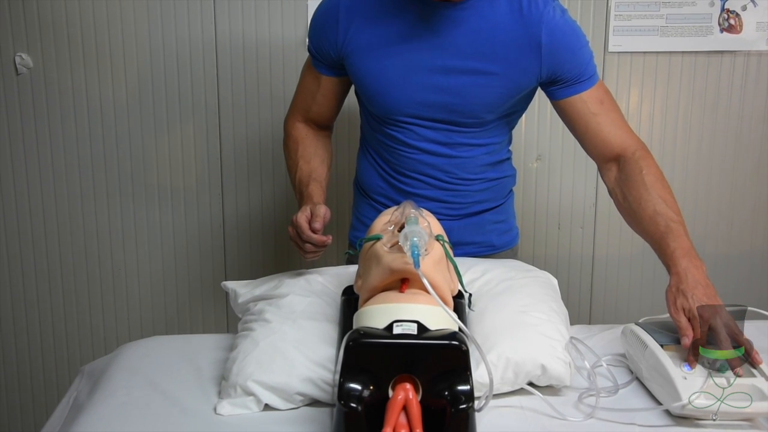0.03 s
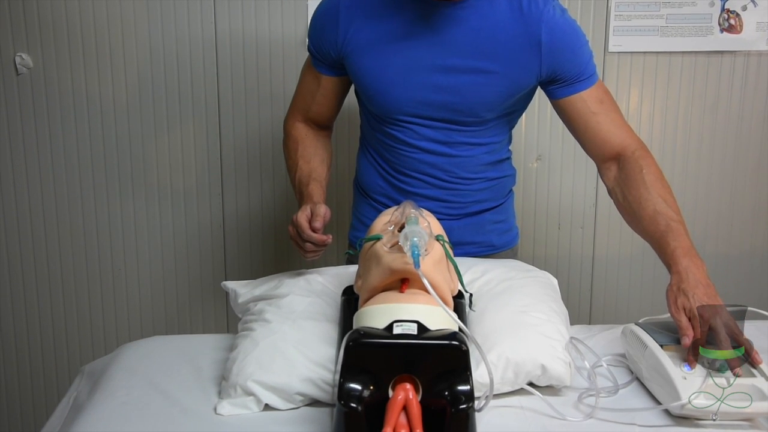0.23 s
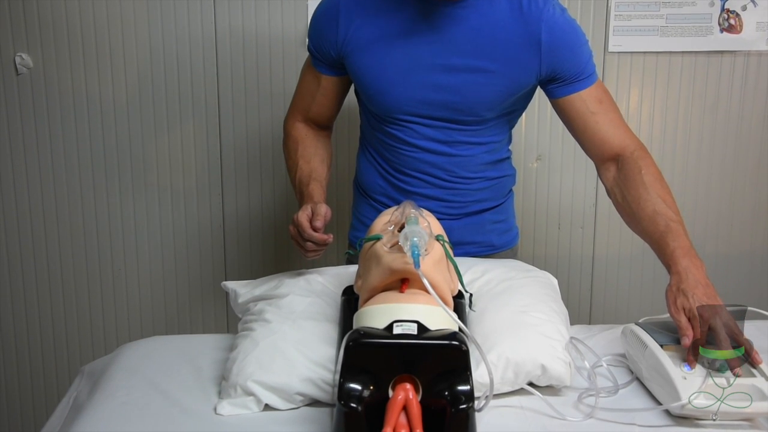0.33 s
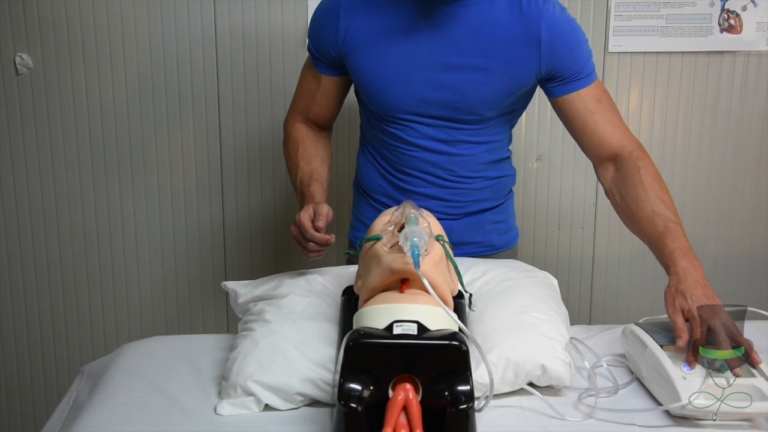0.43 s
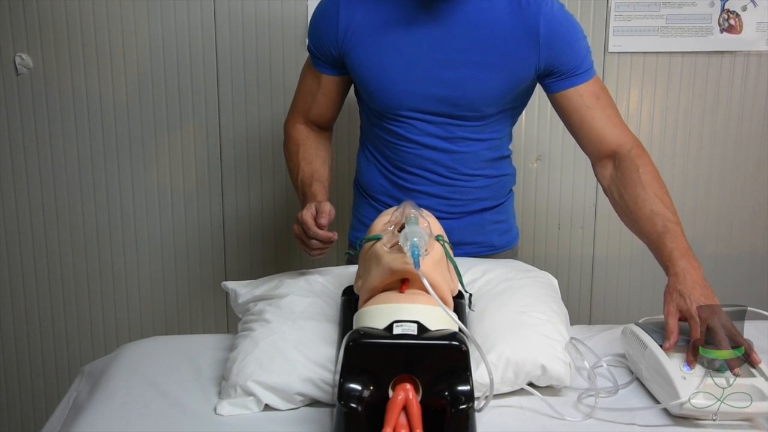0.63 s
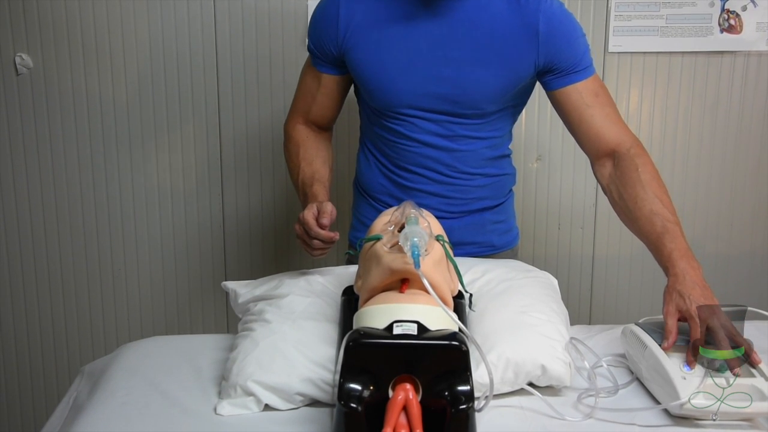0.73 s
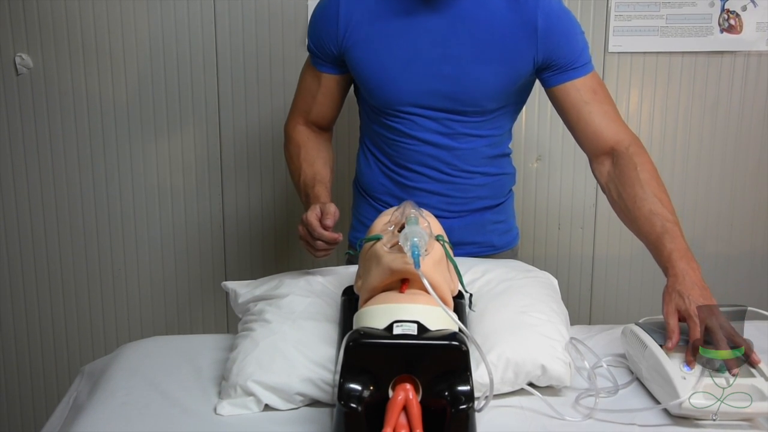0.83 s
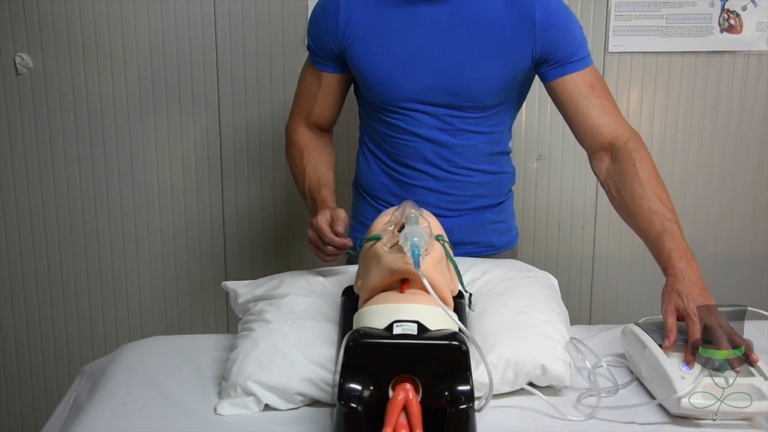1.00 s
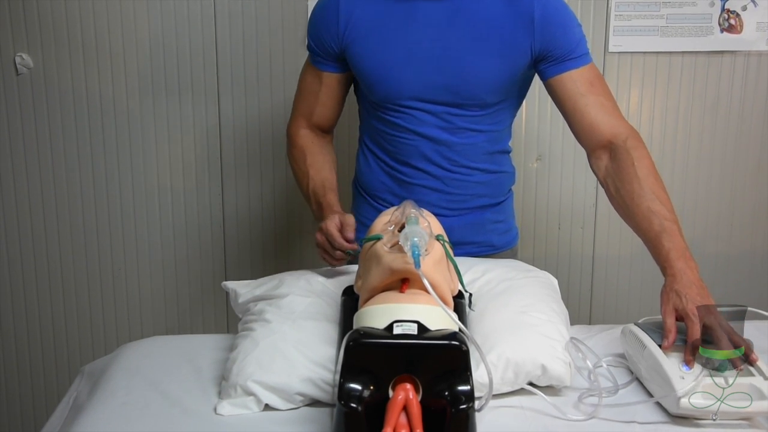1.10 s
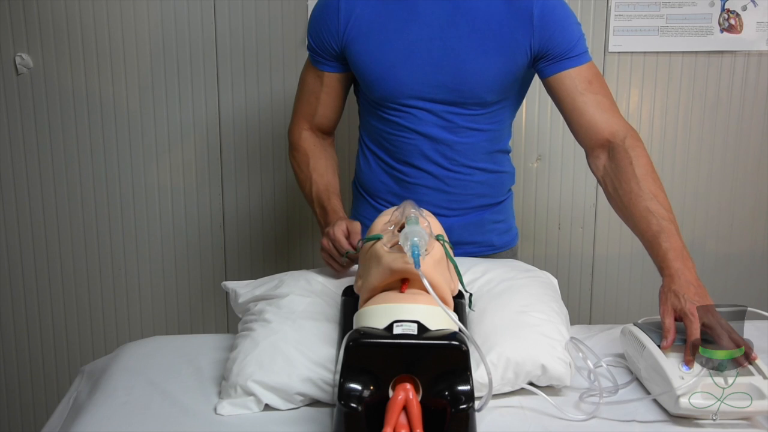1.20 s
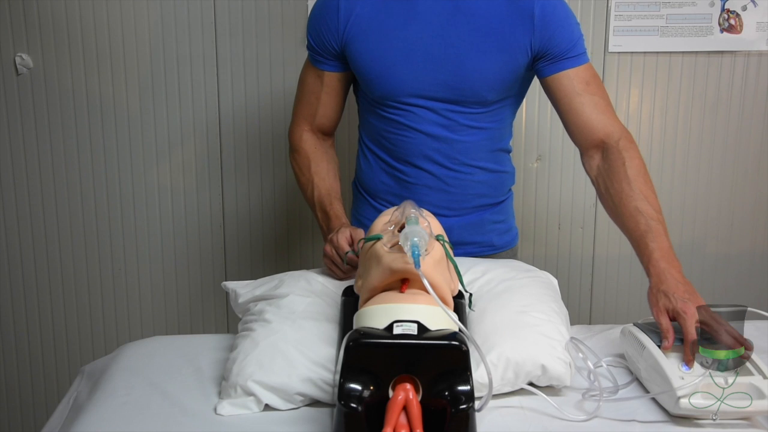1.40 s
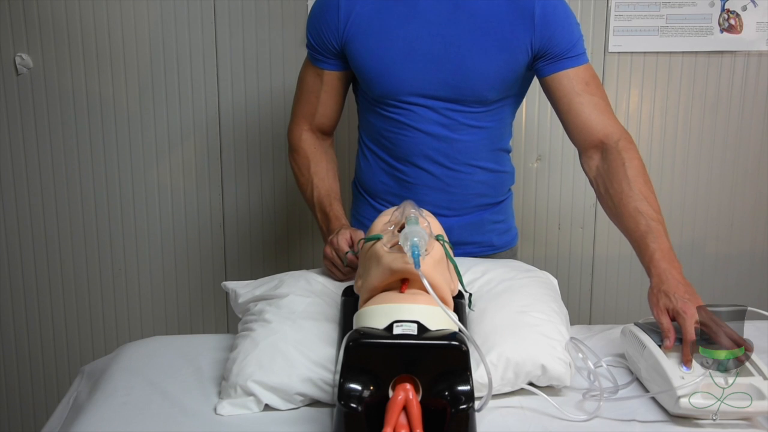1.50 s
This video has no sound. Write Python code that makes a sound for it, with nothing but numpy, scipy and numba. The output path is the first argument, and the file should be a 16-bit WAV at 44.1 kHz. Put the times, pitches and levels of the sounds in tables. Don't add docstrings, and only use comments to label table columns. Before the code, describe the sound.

Small piston air pump starts after a loud switch snap, humming and hissing in a quiet room.

```python
import sys
import numpy as np
from scipy import signal
from scipy.io import wavfile
from scipy.ndimage import uniform_filter1d
from numba import njit

SR = 44100
rng = np.random.default_rng(int(sys.argv[2]) if len(sys.argv) > 2 else 0)


def field_ratio(decibels):
    return 10 ** (np.asarray(decibels, dtype=float) / 20)


def inscribe(sig):
    pcm = np.round(np.clip(np.atleast_2d(sig).T, -1, 1) * 32767)
    wavfile.write(sys.argv[1], SR, pcm.astype(np.int16))


N = 68355


def level(x, db):
    return x * field_ratio(db) / np.sqrt(np.mean(x ** 2))


@njit
def svf(x, hz, width):
    y, b, l = np.empty(len(x)), 0., 0.
    g, k = np.tan(np.pi * hz / SR), width / hz
    for i in range(len(x)):
        v = (b + g * (x[i] - l)) / (1 + g * (g + k))
        b, l, y[i] = 2 * v - b, l + 2 * g * v, k * v
    return y


def walk(rate):
    hold = int(SR / rate)
    steps = np.repeat(rng.standard_normal(N // hold + 1), hold)
    return 1.01 * uniform_filter1d(uniform_filter1d(steps, hold), hold)[:N]


def curve(table, axis):
    rows = np.array(table)
    return np.interp(np.arange(N) / SR, rows[:, 0], rows[:, axis])


def bump(t, at_s, spread_s):
    return np.exp(-.5 * ((t - at_s) / spread_s) ** 2)


def sine(t, hz):
    return np.sin(2 * np.pi * hz * t)


def band(hz, width, wide_db):
    def steep(x):
        x = svf(x, float(hz), 1.38 * width)
        for _ in range(2):
            x = svf(x, float(hz), 2. * width)
        return x
    mid, side = (level(steep(rng.standard_normal(N)), 0) for _ in range(2))
    return mid + field_ratio(wide_db) * side * np.array([[1], [-1]])


def wide(hz, top_db):
    return top_db + 6 * min(np.log2(hz / 12000), 0)


def ring(x, modes, order=1):
    out = 0
    for k, (hz, width, db) in enumerate(modes):
        out = out + (-1) ** (k * order) * field_ratio(db) * svf(x, float(hz), float(width))
    return level(out, 0)


# (time [s], level
# [dB])
SNAP = [
    (.092, -100),
    (.101, -37.5),
    (.115, -28),
    (.134, -22),
    (.165, -28),
    (.2, -34),
    (.233, -49),
    (.262, -60.5),
    (.3, -77),
]
# (frequency [Hz], width [Hz], level [dB], extra fade [dB/s])
SNAP_BODY = [(914, 250, -36, 241.5), (1620, 200, -28.5, 297), (2214, 430, -9.5, 80.5), (2850, 380, -3, -26),
             (3420, 760, -2, -11), (4076, 200, -4.5, 17), (4610, 490, -4.5, 132), (5460, 750, -9, 203),
             (6080, 1200, -7, 232.5), (7500, 1520, -4.5, 137), (9970, 1140, -9.5, 190),
             (11300, 2100, -12.5, 441.5), (13130, 1800, -18.5, 646), (15000, 790, -32, 897)]
# (frequency [Hz], width [Hz], level [dB])
SNAP_RINGS = [(2780, 27, -10), (3000, 34, -11.5), (3884, 37, -11.5), (4110, 23, -14), (5000, 24, -37),
              (5155, 16, -16), (6436, 22, -11), (8190, 19, -16)]


def switch(t):
    snap_s, crack_db, scrape_db = .15, 3, 1.0
    after, rows = np.clip(t - snap_s, 0, 1), np.array(SNAP_BODY)
    out = 0
    for hz, width, db in [row[:3] for row in SNAP_BODY] + SNAP_RINGS:
        fade_db = np.interp(hz, rows[:, 0], rows[:, 3]) * after
        if hz > 11000:
            fade_db = fade_db + 900 * np.clip(t - .18, 0, 1)
        out = out + band(hz, width, wide(hz, -3)) * field_ratio(db - fade_db)
    out = np.array([side - svf(side, 8540., 440.) for side in out])
    crack = crack_db * bump(t, snap_s - .00029, .0012)
    out = out * field_ratio(scrape_db * walk(300) + curve(SNAP, axis=1) + crack)
    out = out * (t > SNAP[0][0]) * (t < SNAP[-1][0])
    return level(out, -27.3 + 10 * np.log10(.19375 * SR / N))


CRANK_HZ = 45.41


def strokes(delay, scatter_db, soft_s):
    stroke_s, jitter_s = 1.0462, .00004
    chance = rng.standard_normal((70, 2))
    at = stroke_s + (np.arange(-47, 23) + delay) / CRANK_HZ + jitter_s * chance[:, 0]
    x = np.zeros(N)
    np.add.at(x, np.clip(at * SR, 0, N - 1).astype(int), field_ratio(scatter_db * chance[:, 1]))
    return np.convolve(x, np.hanning(int(soft_s * SR) + 3), "same") + 1e-18


RATTLE_DB = -11
# (time [s], valve slap [dB], housing knock [dB], air flow [dB])
PUMP = [(.2, -104, -74, -61.5), (.244, -65.5, -98, -54), (.324, -56, -67, -66.5), (.33, -48.5, -75, -63.5),
        (.36, -48, -40.5, -64.5), (.385, -47.5, -63, -53.5), (.444, -52.5, -66.5, -61),
        (.49, -56, -91, -62.5), (.495, -46, -65, -57), (.62, -47, -51.5, -57.5), (.65, -50.5, -46, -57.5),
        (.73, -45, -54, -56), (.79, -49.5, -49, -59.5), (.85, -44, -50, -58.5), (.94, -47.5, -53, -60.5),
        (1.12, -48.5, -47.5, -59.5), (1.16, -50.5, -50.5, -60), (1.39, -50.5, -46.5, -61)]
# (frequency [Hz], width [Hz], level [dB])
VALVE = [(1139, 39, 2), (1174, 20, 3.5), (1275.8, 16, 12), (1244, 24, 0), (1056, 34, -8), (1216, 55, -1.5),
         (1430, 16, -20)]


def valve(slaps, rattle):
    hit = ring(svf(slaps, 1207.0, 257.0), VALVE, order=0)
    return (hit + field_ratio(RATTLE_DB) * ring(rattle, VALVE)) * field_ratio(curve(PUMP, axis=1))


# (frequency [Hz], width [Hz], level [dB])
HOUSING = [(548.2, 18.5, 2.5), (590, 33, -4.5), (514, 24, -4)]
# (time [s], extra level [dB])
HARD_KNOCKS = [(.65, 4), (.712, 8), (.735, 7), (.82, 1), (.868, 9), (.89, 1.5), (.982, 3), (1.068, 3.5),
               (1.11, 1.5), (1.26, 6.5), (1.31, 3.5), (1.35, 3), (1.371, 1), (1.395, 5.5), (1.44, 2),
               (1.485, -1)]


def housing(t, knocks, rattle):
    hard_db = sum(db * bump(t, s, .008) for s, db in HARD_KNOCKS)
    hit = ring(svf(knocks, 548.0, 115.0), HOUSING)
    return (hit + field_ratio(RATTLE_DB) * ring(rattle, HOUSING)) * field_ratio(curve(PUMP, axis=2) - 3.0 + hard_db)


# (frequency [Hz], width [Hz], level [dB])
CASE = [(159, 39, -5), (321, 34, 3.5), (767, 66, 1), (850, 160, -1)]


def case(strikes, rattle):
    return (ring(strikes, CASE) + field_ratio(2.5) * ring(rattle, CASE)) * field_ratio(-63.5 + 1.5 * walk(12.13))


MAINS_HZ = 100
# (time [s], level [dB])
MAINS = [(0.3, -75), (0.42, -72), (0.584, -67), (0.634, -80), (0.696, -60.5), (0.744, -76), (0.766, -66),
         (0.818, -68), (0.852, -78), (0.902, -64), (0.974, -79), (1.02, -71), (1.058, -75), (1.368, -73),
         (1.382, -81), (1.448, -65), (1.486, -87), (1.55, -72)]
# (multiple of the crank rate, level [dB])
WHINE = [(5, -73.5), (6, -70.5), (17, -61.5), (18, -65.5), (19, -65.5), (22, -68), (24, -61), (31, -64.5),
         (33, -71.5)]


def motor(t):
    mains = sine(t, MAINS_HZ) * np.sqrt(2) * field_ratio(curve(MAINS, axis=1) - 1.5)
    whine = 0
    for multiple, db in WHINE:
        phase = 2 * np.pi * rng.random()
        whine = whine + field_ratio(db + 2.3 * walk(12)) * np.sin(2 * np.pi * multiple * CRANK_HZ * t + phase)
    return mains + whine


# (time [s], level [dB])
THUDS = [(0.292, -65), (0.355, -49), (0.509, -50), (.56, -64), (0.701, -48.5), (0.799, -50.5), (.87, -75),
         (.98, -82), (1.26, -79), (1.395, -68), (1.45, -63)]


def table_thuds(t, rattle):
    thuds = sum(field_ratio(db) * bump(t, s, .0092) for s, db in THUDS)
    top = ring(rattle, [(162, 33, 11.2), (290, 144, 7.1)])
    return thuds * (.078 * sine(t, MAINS_HZ) + .44 * top)


def pump(t):
    strong, weak = strokes(0, 1.8, .0003), strokes(.5, 1.5, .0003)
    slaps = strong + field_ratio(-24) * weak
    knocks = strokes(.62, 1.3, .0005)
    rattle = rng.standard_normal(N) * field_ratio(.95 * walk(90))
    starts = np.clip((t - .19) / .042, 0, 1)
    up = np.clip((t - .2) / .42, 0, 1) ** 1.37
    hits = valve(slaps, rattle) + housing(t, knocks, rattle)
    return hits * starts + up * (case(knocks + slaps, rattle) + motor(t)) + table_thuds(t, rattle)


# (frequency [Hz], level per Hz [dB])
AIR = [(41, -54), (70, -19), (412, -18), (541, -7), (934, -19), (1280, 0.5), (1610, -24), (8470, -25),
       (16000, -28.5)]
# (frequency [Hz], width [Hz], level [dB])
JET = [(2310, 89, -14), (2808, 195, -10), (3140, 600, -10.5), (4155, 330, -12), (5274, 82, -10.5),
       (6030, 92, -19), (7406, 380, -10), (8320, 140, -4.5), (9146, 660, -3.5), (10720, 210, -11),
       (11510, 220, -12), (13740, 250, -3.5), (14670, 250, -9.5), (15500, 1100, -9.5)]


def jet_flow(t):
    def late(hz):
        rise_s = .094 + .31 * max(np.log2(hz / 4000), 0)
        return np.clip((t - .27) / rise_s, 0, 1)
    rows, out = np.array(AIR), 0
    for hz in 90 * 2 ** np.arange(0, 7.6, .4):
        db = np.interp(np.log(hz), np.log(rows[:, 0]), rows[:, 1]) + 10 * np.log10(hz / 1000)
        out = out + band(hz, hz / 4.6, wide(hz, -7)) * field_ratio(6.5 + db + 1.5 * walk(12.3)) * late(hz)
    for hz, width, db in JET:
        whistle = band(hz, max(width, hz / 42), wide(hz, -7))
        out = out + whistle * field_ratio(.5 + db + 3 * walk(22.13)) * late(hz)
    flow_db = uniform_filter1d(np.where(t > .36, curve(PUMP, axis=3), -60.), size=2500)
    return out * field_ratio(flow_db)


# (time [s], length [s], level [dB])
SQUEALS = [
    (0.462, 0.037, -60),
    (0.493, 0.0087, -51),
    (0.522, 0.013, -48),
    (0.56, 0.035, -52),
    (0.602, 0.017, -57),
    (0.703, 0.027, -50),
    (0.724, 0.04, -51),
    (0.773, 0.016, -53.5),
    (1.11, 0.025, -54.5),
    (1.397, 0.014, -57),
]
# (time [s], length [s], frequency [Hz], level [dB])
FLARES = [(0.337, 0.07, 1900, -65.5), (0.447, 0.024, 2785, -53.5), (0.436, 0.043, 4480, -60.5),
          (0.587, 0.025, 5405, -66), (0.773, 0.064, 3060, -62), (1.026, 0.021, 2310, -61),
          (1.145, 0.033, 2310, -60.5), (1.229, 0.042, 2310, -63), (1.335, 0.039, 3160, -61),
          (1.303, 0.084, 2310, -64), (1.37, 0.037, 2310, -62.5), (1.47, 0.063, 2310, -66),
          (1.5, 0.036, 5190, -61.5)]


def jet_bursts(t):
    squeal = sum(field_ratio(db) * bump(t, s, .5 * length) for s, length, db in SQUEALS)
    flares = 0
    for s, length, hz, db in FLARES:
        flares = flares + field_ratio(db) * bump(t, s, .55 * length) * band(hz, 180, -32)
    return flares + squeal * band(8300, 147, -22)


def room(t):
    hum = sine(t, 126) * field_ratio(-73 + 1.8 * walk(25)) * np.clip((.17 - t) / .013 + 1, 0, 1)
    buzz = (band(558, 155, -32.5) + .5 * band(250, 70, -36.5)) * field_ratio(-83 + 4.2 * walk(40))
    buzz = buzz * np.clip((t - .1) / .01, 0, 1)
    rumble = field_ratio(-81.5) * band(170, 70, -35) + field_ratio(-91) * band(37, 65, -38.5)
    return hum + buzz + rumble


def scene():
    t = np.arange(N) / SR
    def pan(db):
        return field_ratio(np.array([[db], [-db]]) / 2)
    machine = pump(t) + jet_flow(t) + jet_bursts(t) + room(t)
    return switch(t) * pan(-.7) + machine * pan(-3.8)


def top_cut(x):
    return signal.sosfilt(signal.butter(12, 16170, fs=SR, output="sos"), x)


def record(dry):
    return top_cut(dry)


dry = scene()
out = record(dry)
inscribe(out)
```